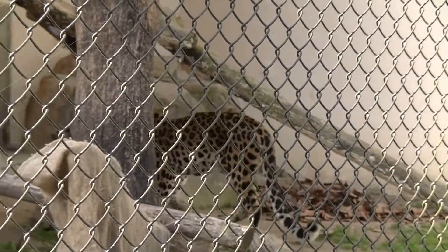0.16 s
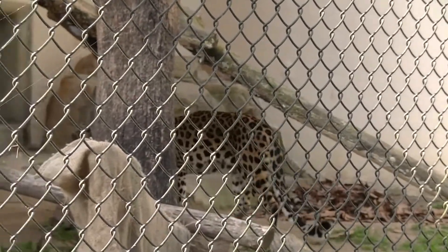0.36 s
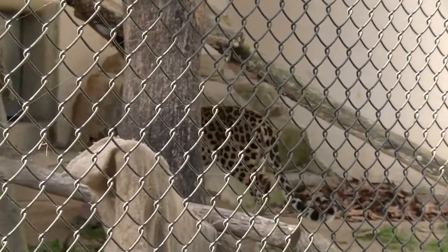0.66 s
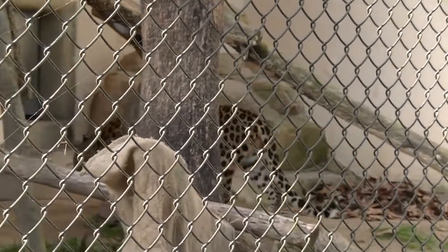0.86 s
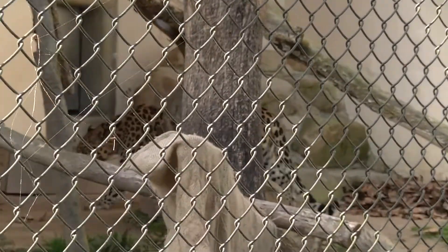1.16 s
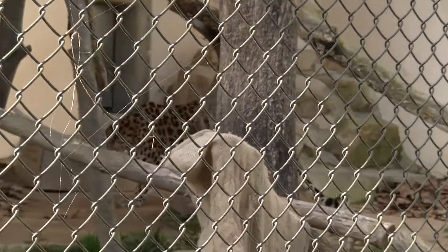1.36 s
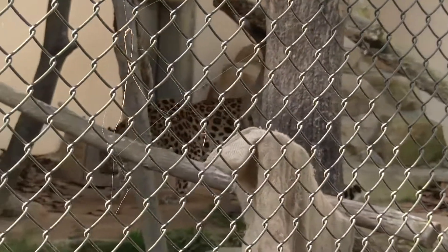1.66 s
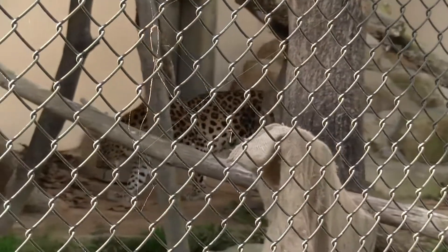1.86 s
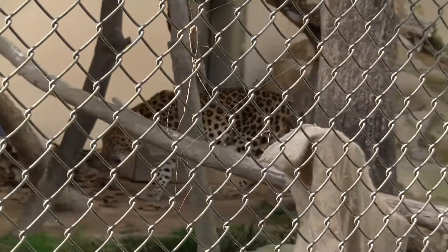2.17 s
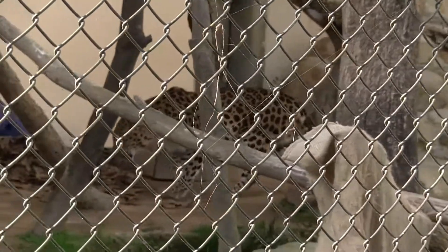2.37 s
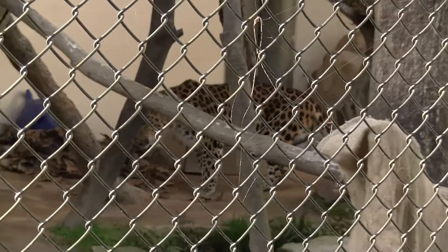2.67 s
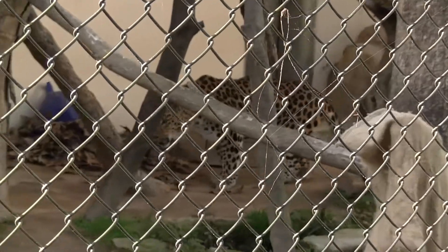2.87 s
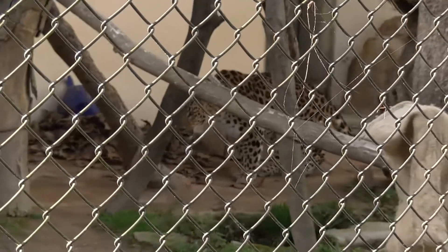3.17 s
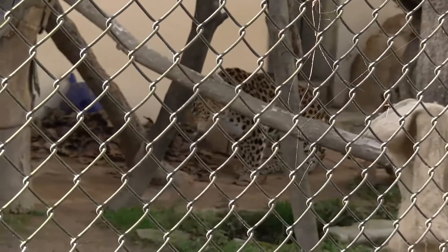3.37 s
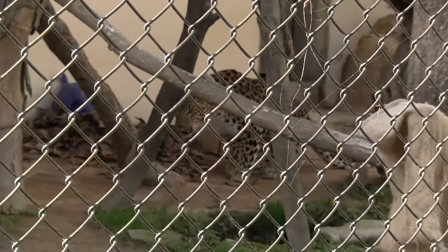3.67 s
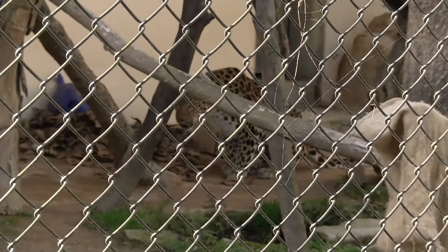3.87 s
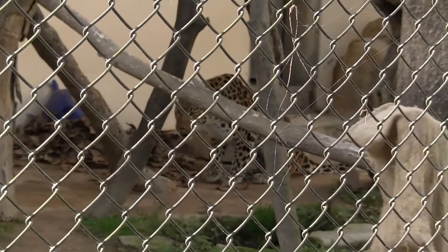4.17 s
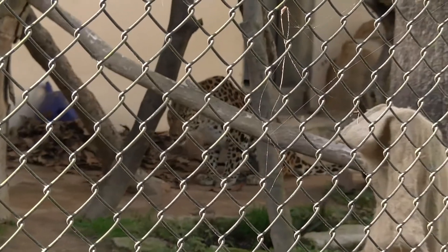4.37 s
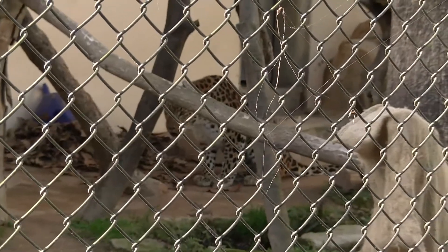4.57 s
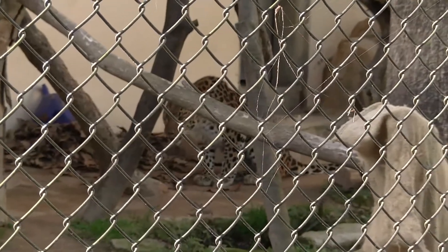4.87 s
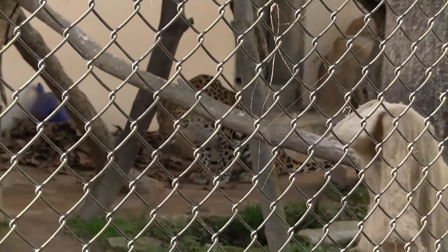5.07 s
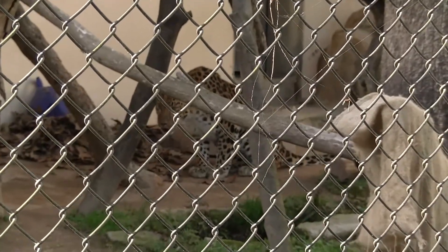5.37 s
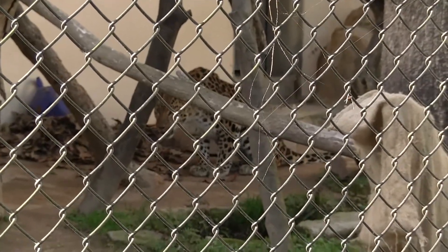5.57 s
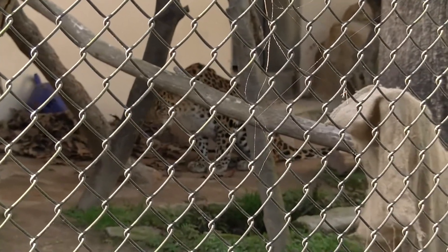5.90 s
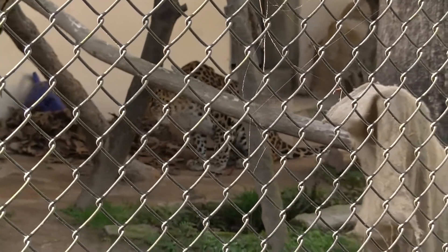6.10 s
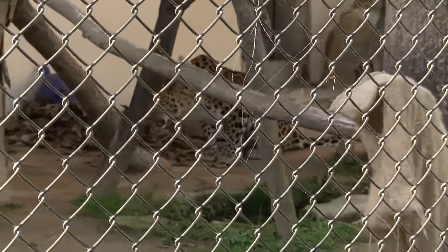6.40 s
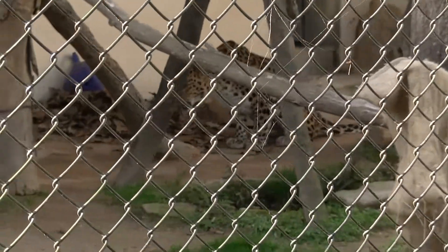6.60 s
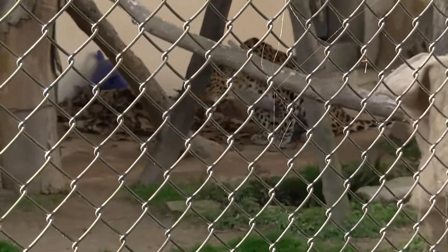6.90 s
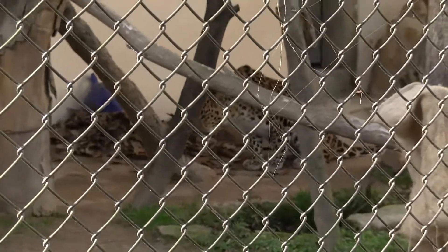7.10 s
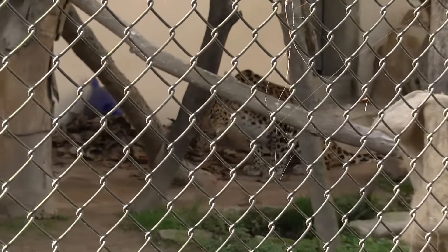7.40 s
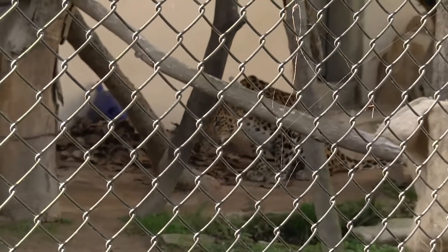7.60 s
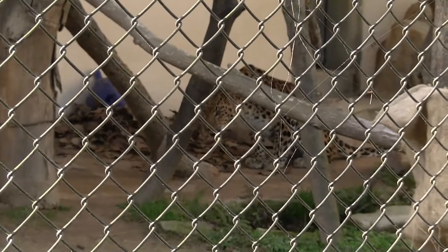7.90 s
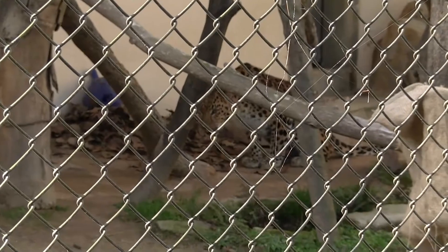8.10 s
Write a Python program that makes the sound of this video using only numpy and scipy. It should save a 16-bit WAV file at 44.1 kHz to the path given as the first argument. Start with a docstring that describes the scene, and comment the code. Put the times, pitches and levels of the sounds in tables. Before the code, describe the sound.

Two low big-cat grunts lead into a steady train of raspy, sawing calls, echoing off enclosure walls above faint outdoor wash.

```python
"""A low wavering hum and a steady wash lie under a walled zoo enclosure, where a leopard saws.
First come two low grunts with a soft thud between, then a train of hoarse strokes, out and in by turns.
Slack vocal folds slap unevenly, each slap lets a puff of air through, and a long throat rings with both.
Single slaps, strong and weak, are laid over the strokes.
The walls throw every call back as echoes and a diffuse tail."""
import sys
import numpy as np
from scipy import signal
from scipy.fft import rfft, irfft
from scipy.io import wavfile
from scipy.ndimage import uniform_filter1d, map_coordinates

SR = 44100
rng = np.random.default_rng(int(sys.argv[2]) if len(sys.argv) > 2 else 0)


def unload_audio(sound):
    """Save the sound as a 16-bit wav file, at the path given as the first command line argument."""
    columns = np.transpose(np.atleast_2d(sound))
    # keep every value between -1 and 1, then stretch to whole-number steps
    steps = np.round(np.clip(columns, -1, 1) * 32767)
    wavfile.write(sys.argv[1], SR, steps.astype(np.int16))


N = 363825  # length in samples
TAPS_HZ = np.fft.rfftfreq(8192, 1 / SR)  # frequency grid of the colouring filters


def gain_of(db):
    """Decibels to amplitude gain."""
    return 10 ** (np.asarray(db) / 20)


def evened(x):
    """Scales a sound to rms 1."""
    return x / np.sqrt(np.mean(x ** 2) + 1e-20)


def read(points, hz):
    """Joins (Hz, value) points by straight lines on a log-frequency axis."""
    f, value = np.transpose(points)
    return np.interp(np.log(hz + 1), np.log(f + 1), value)


def add(mix, s, sound):
    """Adds a sound to the mix at time s."""
    part = mix[max(round(s * SR), 0):][:len(sound)]
    part += sound[:len(part)]


def resonate(x, hz, width, order=3):
    """A steep resonance that follows the curve hz: shift down to zero, smooth a few times, shift back."""
    turn = np.exp(2j * np.pi * np.cumsum(hz * np.ones(len(x))) / SR)
    r = np.exp(-np.pi * width / SR)
    z = x / turn + 1e-18
    for _ in range(order):
        z = signal.lfilter([1 - r], [1, -r], z)
    return evened((turn * z).real)


def humps(modes, size=1):
    """Gain over frequency of a set of resonances, their centres multiplied by size."""
    power = 0
    for hz, width, db in modes:
        gain = gain_of(db) / (1 + ((TAPS_HZ - hz * size) / width) ** 2)
        power = power + gain ** 2
    return np.sqrt(power)


def colour(x, gain):
    """Causal minimum-phase filter with the given gain over frequency; the result has rms 1."""
    log_gain = np.log(np.maximum(np.r_[gain, gain[-2:0:-1]], 1e-5))
    taps = np.fft.ifft(np.exp(np.conj(signal.hilbert(log_gain)))).real[:len(gain)]
    return evened(signal.fftconvolve(x, taps)[:len(x)])


# likeness of left and right in diffuse sound: (f/Hz, likeness 0-1)
STEREO_LIKENESS = [(100, .96), (600, .88), (1200, .72), (2200, .35), (4000, .05), (12000, .05)]


def pair(a, b):
    """Two unrelated spectra become left and right, alike in the bass and apart in the treble."""
    hz = np.fft.rfftfreq(2 * (len(a) - 1), 1 / SR)
    same = np.clip(read(STEREO_LIKENESS, hz), 0, 1)
    return irfft(np.array([a, same * a + np.sqrt(1 - same ** 2) * b]))


# spectral shape of the wash, levelled as a whole afterwards: (f/Hz, relative level/dB per Hz)
WASH_SHAPE = [(20, -39), (45, -23), (85, -12.5), (150, -13.5), (250, -20.5), (350, -28), (800, -32),
              (2700, -43.5), (8000, -52), (15500, -59)]
# bands of the hum: (f/Hz, width of each smoothing pass/Hz, rms level before the microphones/dB)
HUM_BANDS = [(58.8, 7.2, -38), (124.2, 15.5, -43.5)]


def background():
    """Steady outdoor wash of shaped noise, with a low hum of narrow noise bands that waver."""
    hz = np.fft.rfftfreq(2 * N, 1 / SR)
    shape = gain_of(read(WASH_SHAPE, hz))
    wash = pair(*rfft(rng.standard_normal((2, 2 * N))) * shape)[:, :N]
    hum = 0
    for f, width, db in HUM_BANDS:
        # one second of run-in lets the resonance settle
        hum = hum + gain_of(db) * resonate(rng.standard_normal(N + SR), f, width)[SR:]
    return gain_of(-42.5) * evened(wash) + hum


def folds(t, rate_hz, jitter, shimmer_db, puff_s, leak):
    """Uneven slaps of the folds, and the air that puffs through after each."""
    gaps, sizes = rng.standard_normal((64, 2)).T
    turns = np.cumsum(rate_hz * np.ones(len(t))) / SR
    slap_turns = np.r_[0, np.cumsum(np.exp(jitter * gaps[1:]))]
    at = np.searchsorted(turns, slap_turns) + SR // 500  # 2 ms late
    slaps = np.bincount(at, gain_of(shimmer_db * sizes), len(t))[:len(t)]
    opening = evened(signal.lfilter([1], [1, -np.exp(-1 / (puff_s * SR))], slaps))
    return evened(slaps), evened((opening + leak) * rng.standard_normal(SR)[:len(t)])


def blend(slaps, puffs, rough):
    """Mixes slaps and air; rough is the share of air."""
    rough = np.clip(rough, 0, 1)
    return (1 - rough) * slaps + rough * puffs


def fade(t, attack_s, release_s):
    """Straight fade at the start and end of a stroke."""
    return np.clip(t / attack_s, 0, 1) * np.clip((t[-1] - t) / release_s, 0, 1)


def swell(t, rise_s, start_db, fall_s, end_db):
    """Effort of a stroke in dB below its peak: rise, hold, fall."""
    rise = start_db * np.clip(1 - t / rise_s, 0, 1)
    return rise + end_db * np.clip(1 - (t[-1] - t) / fall_s, 0, 1)


def wander(t):
    """Slow random curve, about rms 1."""
    curve = uniform_filter1d(uniform_filter1d(rng.standard_normal(SR), size=1200), size=700)
    return evened(curve)[:len(t)]


def steady(x):
    """Holds the strength of a sound even over a few slaps, so that effort sets it."""
    power = uniform_filter1d(uniform_filter1d(x ** 2, size=1700), size=900)
    return x / np.sqrt(abs(power) + .05 * np.mean(x ** 2))


def bend(x, factor):
    """Glides all resonances of a sound by warping time along the curve factor, taken against its mean."""
    place = np.cumsum(factor / factor.mean())
    return map_coordinates(x, [place], order=3, mode="nearest")


def hooting(chest, hz, share):
    """The folds partly lock onto the first resonance and sing a wavering low tone."""
    waver = evened(uniform_filter1d(rng.standard_normal(SR), size=500))[:len(chest)]
    tone = evened(np.sin(2 * np.pi * np.cumsum(hz * (1 + .06 * waver)) / SR))
    share = np.clip(share, 0, 1)
    return steady((1 - share) * chest + share * tone)


# air hissing past the teeth, its spectral shape: (f/Hz, relative level/dB per Hz)
TEETH_HISS = [(1500, 0), (3000, -14.5), (4000, -7), (4700, -4.5), (5600, -2), (6700, 1), (8000, -3),
              (10000, -4.5), (12500, -9), (14500, -15.5), (16000, -31)]


def hiss(puffs, patchy_db, whistle):
    """Air past wet teeth and tongue, puffs over a steady flow; whistling patches come and go in it."""
    flow = puffs + gain_of(-7) * rng.standard_normal(len(puffs))
    teeth = gain_of(read(TEETH_HISS, TAPS_HZ)) + whistle * humps([(7450, 600, -2.2), (8500, 410, -2)])
    z = signal.stft(colour(flow, teeth), nperseg=256)[2]
    patches = uniform_filter1d(rng.standard_normal(z.shape), size=3, axis=0)
    patches = evened(uniform_filter1d(patches, size=14, axis=1))
    return evened(signal.istft(z * gain_of(patchy_db * patches), nperseg=256)[1][:len(puffs)])


# upper resonances of the open throat, outward: (f before any size factor/Hz, half-width/Hz, level/dB)
OPEN_THROAT = [(809, 72, 6), (903, 76, 3.5), (1027, 34, 3.5), (1286, 64, 4), (1442, 45, 3), (1816, 153, -2),
               (1890, 97, -4.5), (2220, 110, -13), (2390, 94, -4.5), (2650, 210, -9.5), (2830, 67, -14),
               (3200, 176, -10), (3530, 110, -24), (3710, 257, -11.5)]
# single slaps of the folds, strong and weak, and first a soft thud, perhaps a gulp or a paw:
# (t/s, peak level before the slap trim/dB, rasp level/dB)
SINGLE_SLAPS = [(1.296, -22, -21), (1.449, -19, -21), (1.503, -10, -17), (2.052, -9.5, -28),
                (2.206, -2.5, -20.5), (2.674, -11, -17), (2.882, -6, -28), (3.298, -8, -25),
                (3.508, -1, -15), (3.572, -1, -19), (3.992, -13, -20), (4.245, -5, -13.5),
                (4.277, -12, -19), (4.326, -10, -11), (4.572, -12, -14), (4.904, -9, -19),
                (5.563, 1.5, -29), (5.637, -3, -27), (5.669, -15, -23), (6.029, -7, -32), (6.296, -3, -16),
                (6.75, -9, -34), (7.001, -4, -14), (7.734, -0.5, -29)]
SLAP_TRIM_DB = -5


def slap(s, peak_db, rasp_db):
    """One single slap rings the whole throat, with a short dying puff of rasp and hiss."""
    t = np.arange(SR // 20) / SR
    click = signal.unit_impulse(len(t))
    puff = rng.standard_normal(len(t)) * np.exp(-t / 0.0093)
    teeth = colour(puff, gain_of(read(TEETH_HISS, TAPS_HZ)))
    rasp = colour(puff, humps(OPEN_THROAT)) + gain_of(-5.5) * teeth
    ring = resonate(click, 216, 182) + gain_of(-4.5) * resonate(click, 546, 360)
    ring = ring + gain_of(rasp_db) * rasp
    return s - .002, gain_of(peak_db + SLAP_TRIM_DB) * ring / abs(ring).max()


# low resonances of chest and stone corner, which colour every stroke: (f/Hz, half-width/Hz, level/dB)
BODY_MODES = [(66, 9.1, 0.5), (86.6, 8.5, 1), (119.6, 7.95, 8.5), (166.7, 18.5, 0.5), (211.6, 17.8, -1),
              (268, 24.5, -0.5), (352, 14.2, -2.5)]
# upper resonances with the jaw nearly shut: (f before the size factor/Hz, half-width/Hz, level/dB)
CLOSED_THROAT = [(800, 91, 10.5), (952.6, 44, 1.5), (1356, 116, 0), (1990, 150, -6.5), (2470, 114, -5),
                 (2730, 200, -6.5), (3180, 120, -8.5), (3780, 420, -12)]
# outward grunts: (t/s, length/s, rise/s, effort level before the grunt trim/dB, mouth level/dB,
# rasp level/dB, hiss level over the rasp before effort/dB, first resonance f at its crest/Hz,
# the same at the end/Hz, second resonance f at its crest/Hz, size factor on the upper resonances,
# slap rate before it sags/Hz, unevenness of slap spacing, jaw shut at the start 0-1, share of hoot 0-1)
GRUNT_STROKES = [ (0.594, 0.25, 0.045, -17, -18.5, -21, -11.5, 185.5, 166, 497, 0.95, 49.3, 0.099, 0.95, 0.41),
                 (1.413, 0.31, 0.11, -14.5, -17, -19, -10, 183, 151, 523, 1.02, 38.7, 0.088, 1, 0.1),
                 (2.178, 0.25, 0.035, -11, -16, -18.5, -12.5, 219.9, 187.4, 575, 1.023, 49.3, 0.068, 0.48, 0.53),
                 (2.819, .28, 0.036, -13, -6.5, -13.5, -11.5, 237.6, 211, 610, 1.017, 54.8, .14, 0, .31),
                 (3.464, 0.3, 0.058, -11.5, -8, -14.5, -10.5, 256.3, 221.7, 603, 0.97, 59, .16, .06, 0.21),
                 (4.132, 0.31, 0.042, -12, -6, -15, -9, 257.7, 229.4, 617, 1.026, 56.4, 0.16, .06, 0.18),
                 (4.83, 0.31, 0.049, -11.5, -8.5, -16.5, -8, 246.6, 236.7, 607, 1.005, 55, .16, 0.15, .25),
                 (5.523, 0.32, 0.079, -11.5, -8.5, -14.5, -10.5, 246.5, 195, 592, 1.002, 59, .12, 0.16, 0.24),
                 (6.233, 0.28, 0.042, -12.7, -5.5, -13.5, -10.8, 223.5, 195.5, 574, 1.014, 53.7, .11, 0.16, 0.28),
                 (6.931, .3, 0.047, -13, -6.5, -13.5, -11, 231.7, 206.4, 588, 1.02, 47.1, .13, 0.05, 0.44),
                 (7.653, 0.31, 0.041, -12.5, -8, -13.5, -9.5, 230.1, 184, 578, 1.035, 53.5, .12, 0.01, 0.43),
                 ]
GRUNT_TRIM_DB = -3.0
# mouth and rasp lose less than the chest when effort is low (dB won back per dB)
MOUTH_KEEP, RASP_KEEP = 0.24, 0.32
CREST_S = 0.1  # the low resonances climb to their crest here and sink after it
TREMBLE = 0.026  # the throat trembles: rms wander of the two lowest resonances, as a share of their Hz


def grunt(start, length, rise_s, peak_db, open_db, harsh_db, air_db, first_top_hz, first_end_hz,
          second_top_hz, size, rate_hz, jitter, shut, hoot):
    """Outward stroke: the resonances rise and sink as the jaw opens and shuts."""
    t = np.arange(0, length, 1 / SR)
    # effort starts below its peak, rises, holds, and falls as the lungs empty
    push_db = swell(t, rise_s, start_db=-9.5, fall_s=0.12, end_db=-9)
    effort_db = peak_db + push_db
    rasp_db = harsh_db - RASP_KEEP * push_db
    # the mouth shuts after the crest, at 30.5 dB per s
    mouth_db = open_db - MOUTH_KEEP * push_db - 30.5 * np.maximum(t - CREST_S, 0)

    times = [0, CREST_S, length]
    first_hz = np.interp(t, times, [.88 * first_top_hz, first_top_hz, first_end_hz])
    # a shut jaw moves the second resonance less
    second_hz = second_top_hz * np.interp(t, times, [0.947, 1, .9]) ** (1 - shut)
    first_hz = first_hz * (1 + TREMBLE * wander(t))
    second_hz = second_hz * (1 + TREMBLE * wander(t))

    rough = 1.65 * jitter  # the more uneven the slaps, the more air leaks between them
    sag = 1.06 - .45 * t  # the folds slow down as the pressure drops
    slaps, puffs = folds(t, rate_hz * sag, jitter, shimmer_db=1.8, puff_s=.006, leak=.6)
    drive = blend(slaps, puffs, rough)

    narrow = 1 - 0.3 * np.clip(shut, 0, 1)  # a shut mouth loses less sound and rings longer
    chest = colour(resonate(drive, first_hz, 175 * narrow), humps(BODY_MODES))
    chest = hooting(chest, first_hz, hoot)
    rumble = rough * gain_of(-13) * resonate(puffs, 72, 67.1)  # hoarse strokes shake the chest

    jaw = np.clip(shut + 1.58 * t, 0, 1)  # 1 is shut
    mouth = steady(resonate(drive, second_hz, 150 * narrow))
    # a wide open jaw lets out a resonance between the first two
    mouth = mouth + (1 - jaw) * gain_of(-14) * resonate(drive, 371, 170)

    breath = blend(slaps, puffs, rough + 0.58)
    wide = colour(breath, humps(OPEN_THROAT, size))
    closed = colour(breath, humps(CLOSED_THROAT, size))
    # the upper resonances follow the second one a little
    rasp = steady(bend((1 - jaw) * wide + jaw * closed, second_hz ** 0.199))

    # hiss grows faster than the rasp, and thins as the lungs empty
    hiss_db = rasp_db + air_db + 0.66 * (effort_db + rasp_db + 27.5) - 14 * t
    air = hiss(puffs, patchy_db=3, whistle=shut) * fade(t, attack_s=.03, release_s=.02)
    voice = chest + rumble + gain_of(mouth_db) * mouth + gain_of(rasp_db) * rasp + gain_of(hiss_db) * air
    return start, gain_of(effort_db + GRUNT_TRIM_DB) * voice * fade(t, attack_s=0.0056, release_s=0.037)


# echoes from the ground and near walls: (t after the direct sound/s, left gain, right gain)
NEAR_ECHOES = [(.0052, 0.32, 0.18), (0.0129, 0.44, 0.22), (.021, .2, .18), (.034, 0.18, 0.069)]
# how long the enclosure rings: (f/Hz, t to fall by 60 dB/s)
RING_TIMES = [(80, 0.9), (250, 0.5), (600, 0.51), (1500, 0.57), (3500, 0.56), (7000, 0.37), (14000, 0.3)]
# level of that ring against the direct sound: (f/Hz, level/dB)
RING_LEVELS = [(200, -4), (1000, 1.5), (4000, 1), (9000, -1.5)]


def enclosure(x):
    """Direct sound, a few near echoes, and a diffuse tail in which each band dies at its own speed."""
    noise = pair(*rfft(rng.standard_normal((2, SR))))
    hz, t, z = signal.stft(noise, SR, nperseg=256)
    decay = gain_of(-60 * t / read(RING_TIMES, hz)[:, None]) * np.clip(t / 0.0074, 0, 1)
    decay /= np.sqrt(SR * np.mean(decay ** 2, axis=1, keepdims=True))  # energy 1 in each band
    level = gain_of(read(RING_LEVELS, hz))[:, None]
    response = signal.istft(z * decay * level, SR, nperseg=256)[1]
    response[:, 0] += 1
    for delay, *gains in NEAR_ECHOES:
        response[:, round(delay * SR)] += gains
    return signal.fftconvolve(x[None], response, axes=1)[:, :N]


# middle resonances of the inward snore: (f/Hz, half-width/Hz, level/dB)
SNORE_MOUTH = [(385, 93, -5.5), (384.5, 17, -3.5), (539, 23, -6.5), (693, 43, -5.5), (785.4, 28.5, -6)]
# upper resonances of the throat, inward: (f before it glides/Hz, half-width/Hz, level/dB)
SNORE_THROAT = [(1040, 260, -7.5), (1226, 56, 1.5), (1430, 160, -18), (1680, 100, -8), (1832, 130, -4),
                (2170, 91, -7.5), (2380, 62, -7.5), (2785, 71, -12.5), (3093, 110, -11.5),
                (3620, 150, -17.5), (4460, 1500, -25)]
# inward snores: (t/s, length/s, rise/s, effort level before the snore trim/dB, mouth level/dB,
# rasp level/dB)
SNORE_STROKES = [ (1.989, .14, 0.076, -17, -14.5, -25), (2.622, .17, 0.066, -16.5, -7.5, -21),
                 (3.256, .185, 0.087, -17, -6, -18), (3.878, .23, 0.12, -16.5, -8, -20),
                 (4.565, 0.24, 0.09, -14, -7.5, -21), (5.252, 0.25, 0.16, -14.5, -8.5, -19),
                 (5.959, .225, 0.075, -15.5, -10, -18), (6.633, 0.25, .14, -15.5, -8, -18.5),
                 (7.367, .25, 0.085, -16.5, -7.5, -18.5), (8.1, 0.2, 0.12, -17, -7, -18.5), ]
SNORE_TRIM_DB = -2.5


def snore(start, length, rise_s, peak_db, open_db, harsh_db):
    """Inward stroke: a looser flutter of the folds through a narrower throat."""
    t = np.arange(0, length, 1 / SR)
    # a slow swell, a hold and a short fall
    pull_db = swell(t, rise_s, start_db=-11, fall_s=0.04, end_db=-12.5)
    effort_db = peak_db + pull_db
    # mouth and rasp lose less than the chest when effort is low
    mouth_db = open_db - 0.19 * pull_db
    rasp_db = harsh_db - 0.17 * pull_db

    slaps, puffs = folds(t, 42, jitter=.2, shimmer_db=2.5, puff_s=0.0074, leak=0.49)
    drive = blend(slaps, puffs, rough=0.46)
    chest = resonate(drive, 193, 88) + gain_of(-6.0) * resonate(drive, 106.5, 101)
    chest = steady(colour(chest, humps(BODY_MODES)))
    mouth = steady(colour(blend(slaps, puffs, rough=0.55), humps(SNORE_MOUTH)))

    # the throat lengthens as the air is drawn in: its upper resonances sink, wandering a little
    glide = np.exp(-.2 * t + 0.0098 * wander(t))
    rasp = colour(blend(slaps, puffs, rough=0.81), humps(SNORE_THROAT))
    rasp = steady(bend(rasp, glide))
    air = hiss(puffs, patchy_db=3.5, whistle=0) * fade(t, attack_s=.012, release_s=.02)
    voice = chest + gain_of(mouth_db) * mouth + gain_of(rasp_db) * (rasp + gain_of(-10.5) * air)
    return start, gain_of(effort_db + SNORE_TRIM_DB) * voice * fade(t, attack_s=0.0085, release_s=0.032)


def scene():
    """The cat in its enclosure, over the hum and wash."""
    bed = background()
    cat = np.zeros(N)
    for row in GRUNT_STROKES:
        start, _, _, effort_db, _, rasp_db = row[:6]
        # the folds burst open with one slap at the start of a grunt
        add(cat, *slap(start, effort_db + rasp_db + 15, rasp_db=-16))
        add(cat, *grunt(*row))
    for row in SINGLE_SLAPS:
        add(cat, *slap(*row))
    for row in SNORE_STROKES:
        add(cat, *snore(*row))
    return enclosure(cat) + bed


# balance of left over right: (f/Hz, level/dB)
LEFT_OVER_RIGHT = [(60, 7.6), (130, 6.8), (290, 5.7), (640, 5.8), (1400, 5), (3500, 3.8), (7500, 1.3),
                   (15000, .7)]


def record(dry):
    """The microphones lose the deepest bass and the left is louder; peaks past 1 clip; then the band limit."""
    hz = np.fft.rfftfreq(2 * N, 1 / SR)
    left = gain_of(read(LEFT_OVER_RIGHT, hz))
    bass_cut = 1 - 1 / (1 + (hz / 42) ** 4)
    balance = np.array([2 * left, 2 + 0 * left]) / (1 + left)  # the two gains average 1
    heard = irfft(rfft(dry, 2 * N) * bass_cut * balance)[:, :N]
    low_pass = signal.firwin(511, 15750, window=("kaiser", 9), fs=SR)
    return signal.oaconvolve(np.clip(heard, -1, 1), low_pass[None], "same")


dry = scene()
out = record(dry)
unload_audio(out)
```